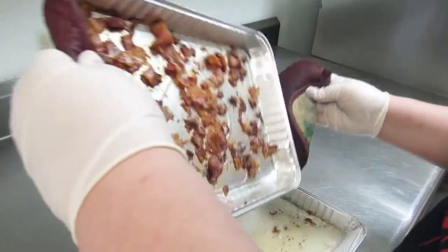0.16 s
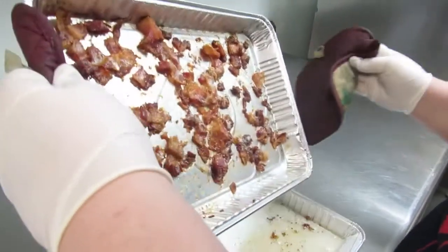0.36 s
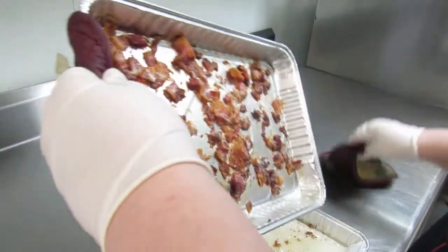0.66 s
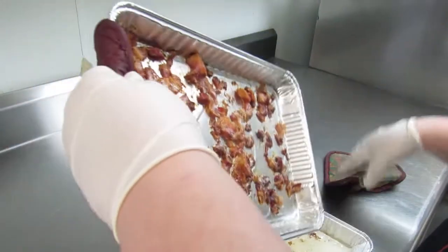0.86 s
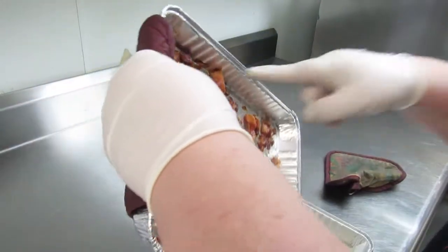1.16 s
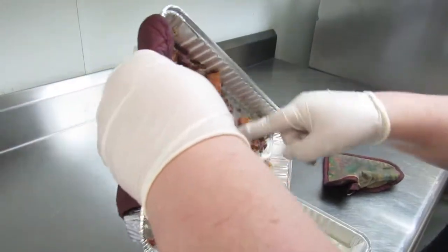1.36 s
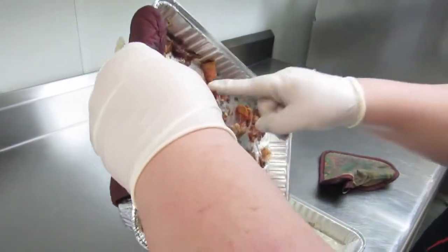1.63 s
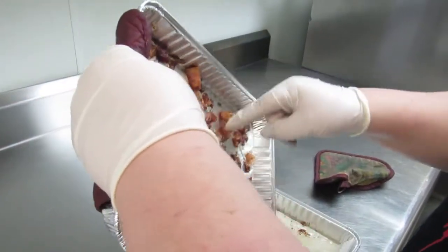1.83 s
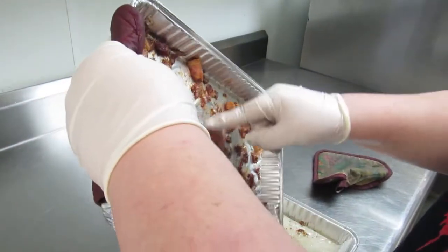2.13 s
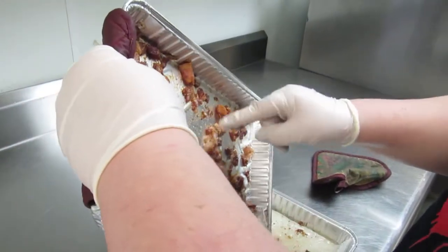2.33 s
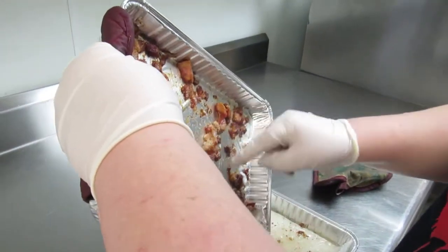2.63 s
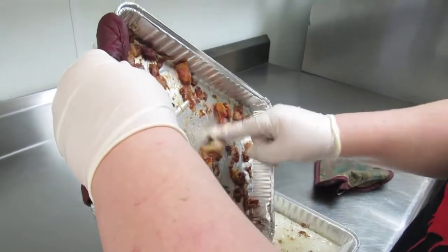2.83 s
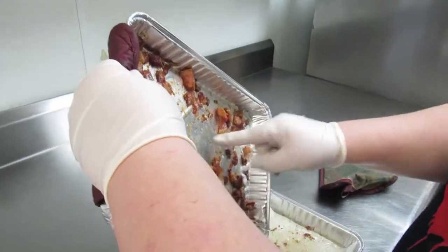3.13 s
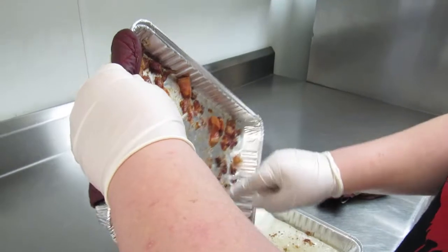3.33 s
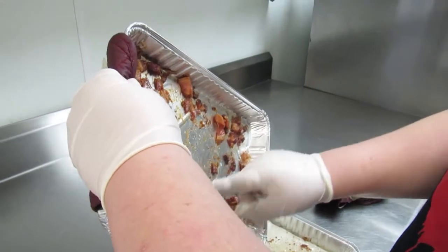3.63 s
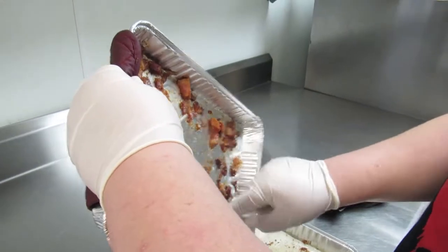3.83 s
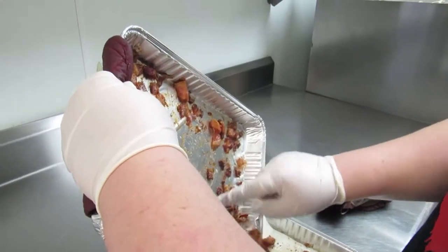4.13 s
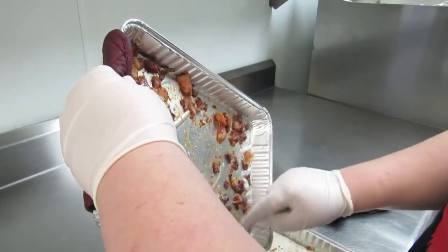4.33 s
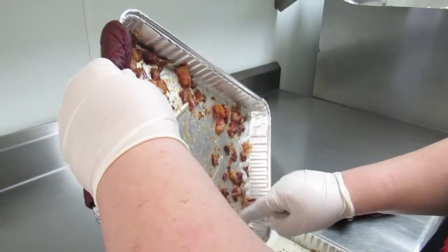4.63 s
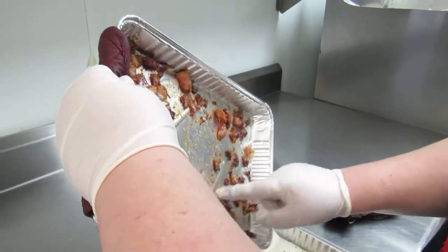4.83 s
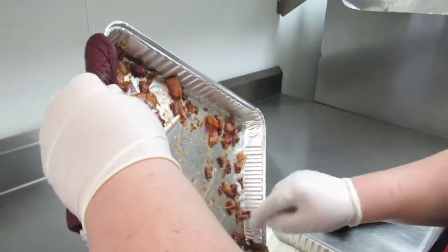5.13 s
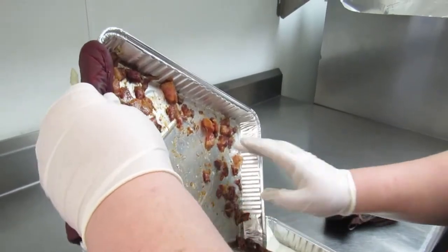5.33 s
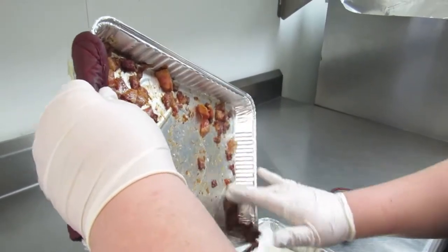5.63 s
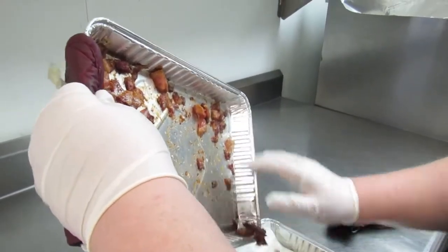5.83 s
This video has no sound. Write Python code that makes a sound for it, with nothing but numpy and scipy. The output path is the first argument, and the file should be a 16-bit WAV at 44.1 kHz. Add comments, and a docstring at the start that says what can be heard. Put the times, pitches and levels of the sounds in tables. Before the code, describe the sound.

A gloved finger scrapes food scraps down a thin foil pan, with crinkles and light taps over a steady kitchen hum.

```python
"""A gloved finger pushes cooked scraps down a thin foil roasting pan, held tipped in a steel kitchen.
Each stroke is stick-slip friction: a dense run of tiny slips excites the foil's modes, creases tick
and the glove sometimes squeaks. The sheet snaps as it flexes and scraps tap into a pan below;
each impulse rings briefly. A faint slither and the swish of a mitt open the scene.
Refrigeration motors and an extractor fan hum steadily throughout."""
import sys
import numpy as np
from scipy import signal
from scipy.fft import rfft, irfft, next_fast_len
from scipy.io import wavfile

SR = 44100
rng = np.random.default_rng(int(sys.argv[2]) if len(sys.argv) > 2 else 0)


def master_out(mix):
    """Clip the mix to full scale and print it as 16-bit PCM to the path in sys.argv[1]."""
    frames = np.transpose(np.atleast_2d(mix))
    ceiling = np.clip(frames, -1, 1)
    pcm = np.round(ceiling * 32767).astype(np.int16)
    wavfile.write(sys.argv[1], SR, pcm)


N = 263718
TIME = np.arange(N) / SR
FFT_SIZE = next_fast_len(N + SR // 2)
FREQS = np.maximum(np.fft.rfftfreq(FFT_SIZE, 1 / SR), 1)
FLAT = np.ones(len(FREQS))


def from_db(db):
    """Amplitude ratio of a level in decibels."""
    return 10 ** (np.asarray(db) / 20)


def unit_rms(x):
    """Normalisation to unit rms."""
    return x / np.sqrt(np.mean(x ** 2) + 1e-20)


def over_hz(points):
    """Interpolation of (Hz, value) points on a log-frequency axis."""
    hz, value = np.transpose(points)
    return np.interp(np.log(FREQS), np.log(hz), value)


def drift(corner_hz):
    """Random modulation: low-passed noise of unit rms."""
    spectrum = rfft(rng.standard_normal(FFT_SIZE)) / (1 + (FREQS / corner_hz) ** 2)
    return unit_rms(irfft(spectrum, FFT_SIZE)[:N])


def resonance(hz, width_hz):
    """Magnitude response of a damped oscillator, 1 at its peak."""
    return 1 / np.sqrt(1 + ((FREQS ** 2 - hz ** 2) / (FREQS * width_hz)) ** 2)


def narrow_noise(hz, width_hz, size):
    """Narrow-band noise: two random signals each pass twice through a resonator; unit rms."""
    radius = np.exp(-np.pi * width_hz / SR)
    poles = [1, -2 * radius * np.cos(2 * np.pi * hz / SR), radius * radius]
    once = signal.lfilter([1, 0, -1], poles, rng.standard_normal((2, size)))
    return unit_rms(signal.lfilter([1, 0, -1], poles, once))


def decaying_noise(t60_s):
    """Overlapping modes decay as damped noise; two tails of unit energy."""
    t = np.arange(SR // 2) / SR
    tail = rng.standard_normal((2, len(t))) * from_db(-60 * t / t60_s)
    return tail / np.sqrt(np.sum(tail ** 2, axis=1, keepdims=True))


# Likeness of left and right for the near pan. Each row: frequency in Hz, coherence from 0 to 1.
NEAR_COHERENCE = [(300, 0.88), (1000, 0.95), (2500, 1), (4500, 1), (7000, 0.95), (10000, 0.4), (15000, .42)]

def coloured(pair, gain=FLAT, coherence=NEAR_COHERENCE):
    """Minimum-phase filtering at unit power; two independent signals mix to partly coherent stereo."""
    cepstrum = irfft(np.log(unit_rms(gain) + 1e-6), FFT_SIZE)
    cepstrum[1:FFT_SIZE // 2] *= 2   # folding the cepstrum makes the filter causal
    cepstrum[FFT_SIZE // 2 + 1:] = 0
    mid, side = rfft(pair, FFT_SIZE) * np.exp(rfft(cepstrum))
    alike = np.clip(over_hz(coherence), 0, 1)
    stereo = np.sqrt((1 + alike) / 2) * mid + np.sqrt((1 - alike) / 2) * side * [[1], [-1]]
    return irfft(stereo, FFT_SIZE)[:, :N]


def kitchen_reverb(direct, delay_s, t60_s, level_db):
    """Reverberation: hard walls return a short diffuse tail."""
    tail = np.pad(decaying_noise(t60_s), ((0, 0), (int(delay_s * SR), 0)))
    reflected = signal.fftconvolve(direct.mean(axis=0, keepdims=True), tail)[:, :N]
    return from_db(level_db) * coloured(reflected)


# Spectrum of the rushing air. Each row: frequency in Hz, relative density in dB.
AIR_SPECTRUM = [(25, -21), (50, -7), (90, 2), (150, -5), (300, 2), (430, -5.5), (590, -14), (690, -26),
                (860, -12.5), (1400, -17), (2300, -25), (4400, -38.5), (10000, -39.5), (15500, -41.5)]
# Duct and cabinet resonances. Each row: frequency in Hz, nominal width in Hz, rms level in dB.
DUCT_MODES = [(126.1, 15, -38), (172, 19, -43.5), (213.3, 25, -36), (238.5, 11.5, -34), (253.3, 26.7, -32),
              (371.4, 17, -44.5), (416, 16.4, -43.5), (925, 50, -77), (1118, 6.3, -57.5)]
# Likeness of left and right for the diffuse rush. Each row: frequency in Hz, coherence from 0 to 1.
AIR_COHERENCE = [(25, 0.55), (60, 0.99), (130, 1), (300, 0.97), (650, 0.83), (1300, 0.89), (2600, 1),
                 (4500, 1), (7000, 0.74), (10000, 0.43), (15000, .42)]

def extractor(rush_db):
    """Broadband flow noise from the fan, with narrow humps where ducts and cabinets resonate."""
    rush_power = (from_db(rush_db) * unit_rms(from_db(over_hz(AIR_SPECTRUM)))) ** 2
    duct_power = sum((from_db(db) * unit_rms(resonance(hz, width_hz * 1.45) ** 2)) ** 2
                     for hz, width_hz, db in DUCT_MODES)
    power = rush_power + duct_power
    return np.sqrt(power.mean()) * coloured(rng.standard_normal((2, N)), np.sqrt(power), AIR_COHERENCE)


# Motor hum. Each row: frequency in Hz, rms level in dB, waver as a share of the amplitude.
MOTOR_TONES = [(55.8, -48, .2), (57.9, -46.5, 0.17), (120.07, -33.5, 0.44), (128.47, -28.5, 0.047),
               (175.5, -40, 0.53), (235.9, -25.5, 0.13), (257, -33.5, 0.39), (385, -50.5, 0.44),
               (473, -52.5, 0.22), (515, -57, 0.46), (519, -51.5, 0.61), (772, -60, 0.58)]

def motors(waver_hz):
    """Amplitude and phase modulation: each steady hum tone of the motors and fan wavers at random."""
    hum = 0
    for hz, db, waver in MOTOR_TONES:
        phase = 2 * np.pi * (hz * TIME + rng.random())
        sway = waver / np.sqrt(2)
        in_phase = (1 + sway * drift(waver_hz)) * np.cos(phase)
        quadrature = sway * drift(waver_hz) * np.sin(phase)
        hum = hum + from_db(db) * np.sqrt(2) * (in_phase + quadrature)
    return hum


# Spectrum of the slither. Each row: frequency in Hz, relative density in dB.
SLITHER_SPECTRUM = [(2500, -9), (5600, -13), (7000, 0), (8200, -3), (12000, -2), (15500, -7)]

def slither(level_db, hold_s, fade_db_per_s):
    """Sliding friction: a soft high rustle holds as the pan tips, then decays exponentially."""
    envelope = from_db(level_db - fade_db_per_s * np.maximum(TIME - hold_s, 0))
    return envelope * coloured(rng.standard_normal((2, N)), from_db(over_hz(SLITHER_SPECTRUM)))


def mitt_swish(middle_s, half_width_s, hz, width_hz, peak_db):
    """Friction noise in a narrow band swells and fades as the mitt slides off the rim."""
    envelope = from_db(peak_db) * np.exp(-((TIME - middle_s) / half_width_s) ** 2)
    return coloured(envelope * narrow_noise(hz, width_hz, N))


# Squeaks on the greasy foil. Each row: middle in seconds, length in seconds, pitch in Hz, peak in dB.
GLOVE_SQUEAKS = [(2.961, 0.053, 6200, -51), (3.621, 0.02, 5200, -42.5), (4.092, 0.028, 10000, -37.5),
                 (5.23, 0.035, 8150, -47), (5.635, 0.025, 12500, -33)]

def squeaking(width_share):
    """Nearly periodic stick-slip: while the glove sticks, its slips crowd round one pitch."""
    out, t = np.zeros((2, N + SR)), np.arange(SR // 4) / SR
    for middle_s, length_s, hz, db in GLOVE_SQUEAKS:
        swell = np.exp(-2 * ((t - t.mean()) / length_s) ** 2)
        at = int((middle_s - t.mean()) * SR)
        out[:, at:at + len(t)] += from_db(db) * swell * narrow_noise(hz, width_share * hz, len(t))
    return coloured(out)


# The pan's main modes. Each row: frequency in Hz, width in Hz, height in dB above the small modes.
PAN_RESONANCES = [(918, 130, 12), (1086, 92, 8.5), (1350, 100, 6.5), (1600, 230, 3), (2000, 100, 2.5),
                  (2420, 130, 1), (3080, 340, 3), (3470, 260, 0.5), (4370, 210, 0.5), (5800, 400, 0.5),
                  (8300, 1000, 2.5), (9950, 710, 1)]

def pan_response():
    """Modal superposition: the main resonances stand out of a flat bed of dense small ones."""
    return 1 + sum((from_db(db) - 1) * resonance(hz, width_hz) ** 2
                   for hz, width_hz, db in PAN_RESONANCES)


ONSET_SAMPLES = SR // 80   # a snap's level is its rms over this first instant
# Snaps and taps of the foil. Each row: start in seconds, level in dB, hardness in dB,
# pitch of the struck spot in Hz, level of its ring in dB.
FOIL_SNAPS = [ (0.2055, -42.5, 1, 3420, -56), (1.4391, -40.5, -6.5, 3590, -46),
              (1.78, -47, 4, 12300, -37.5), (1.8248, -42, -5, 1620, -38.5), (2.033, -41.5, -1, 442, -26),
              (2.116, -35.5, -2.5, 11400, -41.5), (2.1751, -38, -8, 2260, -29.5),
              (2.179, -43.5, -12, 1494, -27.5), (2.422, -43.5, -7.5, 1440, -41),
              (2.6943, -45.5, -5, 10500, -54), (2.7388, -41, -5, 1027, -32.5),
              (2.856, -42, -5.5, 3350, -39), (2.866, -44.5, 1, 1830, -38.5), (3.065, -47, 0.5, 10800, -55),
              (3.393, -44.5, -5, 1390, -34.5), (3.4248, -39, -7, 1350, -34.5),
              (3.571, -45.5, -4, 2650, -45), (3.985, -42.5, 0, 3400, -47), (4.01, -37, -6, 1730, -39),
              (4.1397, -42, -4, 4730, -55), (4.236, -48.5, -5, 6030, -57), (4.325, -51, -12, 1380, -36.5),
              (4.597, -54.5, 3, 9000, -58), (4.668, -56, -1, 6950, -50.5), (4.766, -49, -4, 6500, -58),
              (4.9499, -37.5, -14, 1130, -43), (4.953, -41, -13, 263, -25), (4.9935, -34.5, -5, 2400, -41),
              (5.1051, -29.5, 6, 9570, -36), (5.587, -39, 2, 4000, -41), (5.6713, -39, 7, 2260, -31),
              (5.71, -31.5, 1, 1420, -38), (5.755, -35.5, 0.5, 6420, -33), (5.827, -36, -1, 8530, -43),
              (5.8442, -38.5, -2, 1410, -37)]

def spot_rings(t60_s, pitch_spread, rise_s, count=10):
    """Free vibration: each struck patch of foil rings with a cluster of close, damped modes."""
    out, t = np.zeros((2, N + SR)), np.arange(SR // 5) / SR
    for start_s, _, _, hz, db in FOIL_SNAPS:
        pitches = hz * (1 + pitch_spread * rng.uniform(-1.01, 1, (count, 1)))
        modes = np.sin(2 * np.pi * (pitches * t + rng.random((2, count, 1)))).sum(axis=1)
        ring = modes * (1 - np.exp(-t / rise_s)) * from_db(-60 * t / t60_s)
        ring /= np.sqrt(np.mean(ring[:, :ONSET_SAMPLES] ** 2, axis=1, keepdims=True))
        at = int(start_s * SR)
        out[:, at:at + len(t)] += from_db(db) * ring
    return coloured(out)


def snap_bursts(levels_db, rise_s, t60_s, echo_s, echo_db):
    """Early reflection: the foil's brief shiver and its echo off the steel table add in power."""
    out, t = np.zeros((2, N + SR)), np.arange(SR // 5) / SR
    shiver = (1 - np.exp(-t / rise_s)) * from_db(-60 * t / t60_s)
    echo = from_db(echo_db) * np.interp(t - echo_s, t, shiver, left=0)
    envelope = np.hypot(shiver, echo)
    envelope /= np.sqrt(np.mean(envelope[:ONSET_SAMPLES] ** 2))
    for (start_s, *_), db in zip(FOIL_SNAPS, levels_db):
        at = int(start_s * SR)
        out[:, at:at + len(t)] += from_db(db) * envelope * rng.standard_normal((2, len(t)))
    return out


# Spectra of a snap's body, rim and crack. Each row: frequency in Hz, relative density in dB.
BODY_SPECTRUM = [(150, -8), (480, 2), (690, -7), (900, -3), (1300, -1.5), (1850, -3), (2500, -12),
                 (6000, -27)]
RIM_SPECTRUM = [(900, -11), (1600, -13), (2100, -1), (2900, 1), (4500, -7), (6000, -11), (15000, -36)]
CRACK_SPECTRUM = [(1500, -44), (3800, 8.5), (5200, 4), (7000, 2.5), (10000, 7), (13000, 0.5), (15500, -5)]

def snapping(pan):
    """Impulse excitation: a harder snap has more short, bright crack and less long-ringing body."""
    _, level_db, hardness_db, *_ = np.transpose(FOIL_SNAPS)
    body = snap_bursts(level_db - hardness_db, rise_s=0.00039, t60_s=0.0988, echo_s=0.0045, echo_db=-8)
    rim = snap_bursts(level_db - 1, rise_s=0.0004, t60_s=0.0353, echo_s=0.0068, echo_db=-5)
    crack = snap_bursts(level_db + hardness_db, rise_s=0.00018, t60_s=0.0369, echo_s=0.0044, echo_db=-4.5)
    parts = [(body, BODY_SPECTRUM), (rim, RIM_SPECTRUM), (crack, CRACK_SPECTRUM)]
    return sum(coloured(part, from_db(over_hz(spectrum)) * pan) for part, spectrum in parts)


def crinkles(per_s, low_hz, high_hz, t60_cycles, spread_db, count=20):
    """A Poisson train of uneven ticks: creases flick over, each ringing at its own pitch; unit rms."""
    sizes = from_db(spread_db * np.minimum(rng.exponential(1, N), 3)) * rng.choice([-1, 1], N)
    ticks = sizes * (rng.random(N) < per_s / SR)
    crease = rng.integers(0, count, N)
    out, t = 0, np.arange(SR // 40) / SR
    for k, hz in enumerate(np.geomspace(low_hz, high_hz, count)):
        ring = np.sin(2 * np.pi * (hz * t + rng.random((2, 1)))) * from_db(-60 * t * hz / t60_cycles)
        out = out + signal.oaconvolve([ticks * (crease == k)], unit_rms(ring))[:, :N]
    return unit_rms(out)


def friction(median_per_s, spread_db, t60_s, clump_db, clump_hz, patches):
    """Stick-slip friction: tiny uneven slips come in clumps, each ringing a patch of foil; unit rms."""
    sizes = from_db(spread_db * np.minimum(rng.exponential(1, N), 4)) * rng.choice([-1, 1], N)
    slips = sizes * (rng.random(N) < median_per_s / SR * from_db(clump_db * drift(clump_hz)))
    patch = rng.integers(0, patches, N)
    rings = sum(signal.oaconvolve([slips * (patch == k)], decaying_noise(t60_s)[:, :SR // 20])
                for k in range(patches))
    return unit_rms(rings[:, :N])


def pressure(start_s, press_s, ease_s, depth_db=10, touch_s=0.006, lift_s=0.021):
    """Amplitude envelope of a stroke: the finger touches, presses ever harder, eases off and lifts."""
    t = np.maximum(TIME - start_s, 0)
    arch_db = np.interp(t, [0, press_s, press_s + ease_s], [-depth_db, 0, -depth_db])
    lifted_s = np.clip(t - press_s - ease_s, 0, 20 * lift_s)
    return from_db(arch_db) * np.minimum(t / touch_s, 1) * np.exp(-lifted_s / lift_s)


# Spectra of the fine hiss and the coarse drag. Each row: frequency in Hz, relative density in dB.
HISS_SPECTRUM = [(700, -27), (2000, -10), (3500, -5.5), (5500, 0), (8000, 1.5), (11000, 2.5), (13000, 0.5),
                 (15500, -5)]
DRAG_SPECTRUM = [(300, -31), (550, 7.5), (700, -12.5), (880, -4.5), (1400, 1), (2400, -0.5), (4200, -4),
                 (7000, -16), (15000, -45)]
# Strokes of the finger and slides of the scraps. Each row: start in seconds, pressing time in seconds,
# easing time in seconds, peak hiss level in dB, peak drag level in dB.
FINGER_STROKES = [ (0.0, 0.043, 0.053, -47, -50), (0.73, 0.022, .035, -48, -49),
                  (1.72, .06, 0.042, -44, -50), (2.45, 0.045, 0.15, -54.5, -52),
                  (2.62, 0.045, 0.015, -42.5, -40.5), (2.69, .06, 0.08, -52, -43),
                  (2.85, 0.12, 0.044, -42, -41), (3.29, 0.032, 0.09, -50, -45.5),
                  (3.41, 0.028, 0.15, -46.5, -40.5), (3.58, 0.061, 0.018, -43, -40.5),
                  (3.849, 0.072, 0.042, -42, -38), (3.979, 0.11, 0.11, -40.5, -38.5),
                  (4.26, 0.028, .02, -46.5, -48), (4.65, .025, .05, -53, -49),
                  (4.952, 0.039, 0.22, -37, -34), (5.02, 0.042, 0.054, -37.5, -36),
                  (5.17, 0.054, 0.045, -42, -38), (5.305, 0.016, .04, -49, -44.5),
                  (5.546, 0.14, .14, -30, -30), (5.668, .012, 0.046, -29, -30.5),
                  (5.83, .015, 0.11, -48, -37.5)]

def scraping(pan, creep_hiss_db, creep_drag_db, ticks_over_hiss_db):
    """Friction noise follows pressure: the glove hisses, creases tick, scraps drag in coarser slips."""
    # Scraps never stop creeping on the tipped foil; the strokes add to that in power.
    hiss_power, drag_power = from_db(creep_hiss_db) ** 2, from_db(creep_drag_db) ** 2
    for start_s, press_s, ease_s, hiss_db, drag_db in FINGER_STROKES:
        push = pressure(start_s, press_s, ease_s)
        hiss_power = hiss_power + (from_db(hiss_db) * push) ** 2
        drag_power = drag_power + (from_db(drag_db) * push) ** 2
    fine = friction(median_per_s=3000, spread_db=3, t60_s=0.025, clump_db=3, clump_hz=61, patches=12)
    coarse = friction(median_per_s=1000, spread_db=3.5, t60_s=0.049, clump_db=1, clump_hz=40, patches=7)
    creases = crinkles(per_s=120, low_hz=1980, high_hz=13000, t60_cycles=25, spread_db=2)
    hiss = coloured(np.sqrt(hiss_power) * fine, from_db(over_hz(HISS_SPECTRUM)) * pan)
    drag = coloured(np.sqrt(drag_power) * coarse, from_db(over_hz(DRAG_SPECTRUM)) * pan)
    ticks = coloured(np.sqrt(hiss_power) * from_db(ticks_over_hiss_db) * creases, pan)
    return hiss + drag + ticks


def scene():
    """Superposition of the pan close by, its reverberation and the machines all around."""
    pan = pan_response()
    foil = scraping(pan, creep_hiss_db=-58.5, creep_drag_db=-57, ticks_over_hiss_db=-7)
    foil += squeaking(width_share=0.25)
    foil += slither(level_db=-54.5, hold_s=0.86, fade_db_per_s=28)
    foil += mitt_swish(middle_s=0.35, half_width_s=0.12, hz=7100, width_hz=850, peak_db=-59.5)
    foil += snapping(pan)
    foil += spot_rings(t60_s=0.0494, pitch_spread=0.1734, rise_s=0.00049)
    reverb = kitchen_reverb(foil, delay_s=0.008, t60_s=0.28, level_db=-12)
    return foil + reverb + motors(waver_hz=2.6) + extractor(rush_db=-31.5)


# Level difference of the microphone ports. Each row: frequency in Hz, left minus right in dB.
PORT_BALANCE = [(60, 0), (125, .6), (250, .3), (2000, 0), (5000, -.4), (9000, -1.5), (15000, -1.8)]
# Phase difference of the ports. Each row: frequency in Hz, lead of the left in radians.
PORT_LEAD = [(55, 0.64), (125, 0.63), (240, 0.31), (520, 0.16), (1100, 0)]

def record(dry):
    """Interchannel differences: the ports differ a little in level and phase; a low-pass cuts the top."""
    left_gain = from_db(over_hz(PORT_BALANCE) / 2) * np.exp(0.5j * over_hz(PORT_LEAD))
    heard = irfft(rfft(dry, FFT_SIZE) * np.array([left_gain, 1 / left_gain]), FFT_SIZE)[:, :N]
    low_pass = signal.ellip(12, 0.1, 90, 15000, fs=SR, output="sos")   # steep above 15 kHz
    return signal.sosfilt(low_pass, heard)


dry = scene()
out = record(dry)
master_out(out)
```